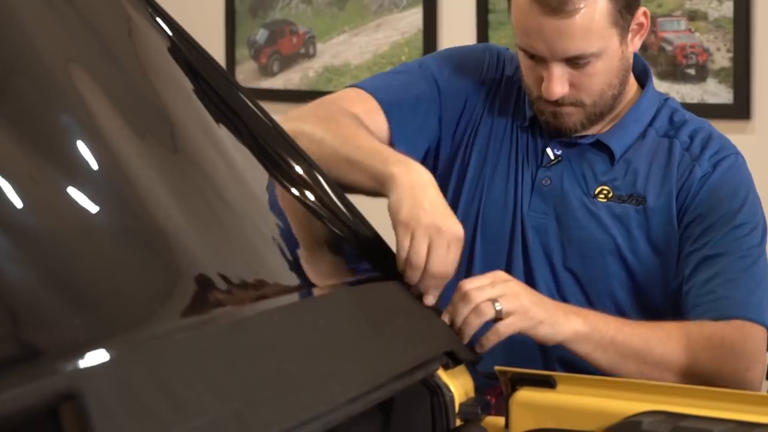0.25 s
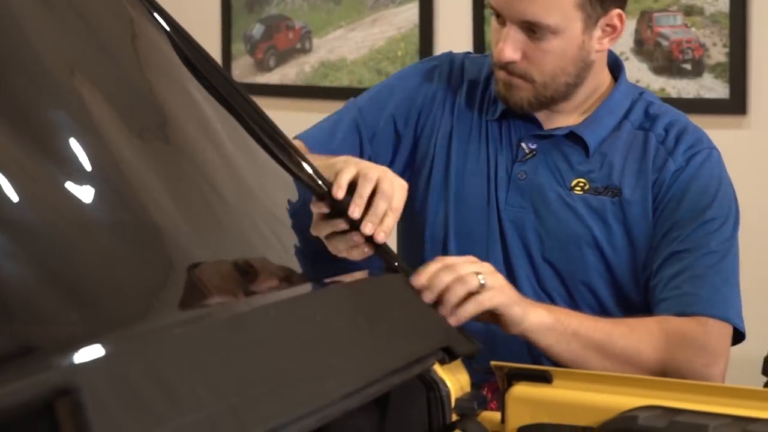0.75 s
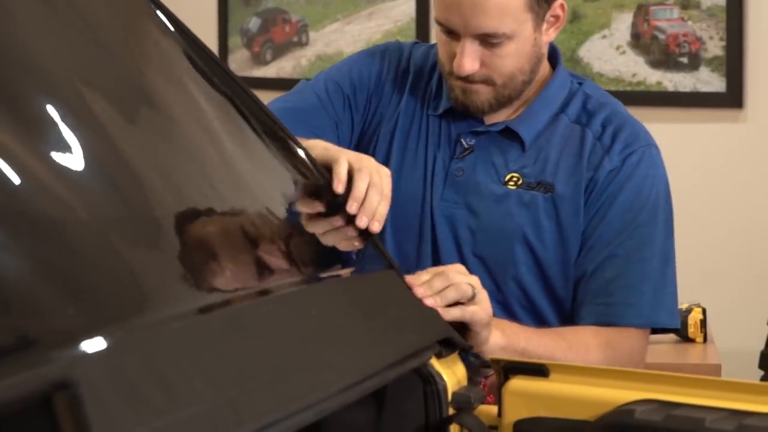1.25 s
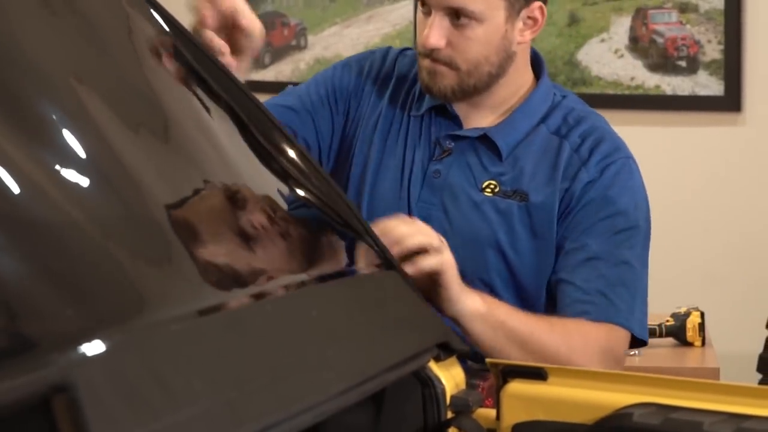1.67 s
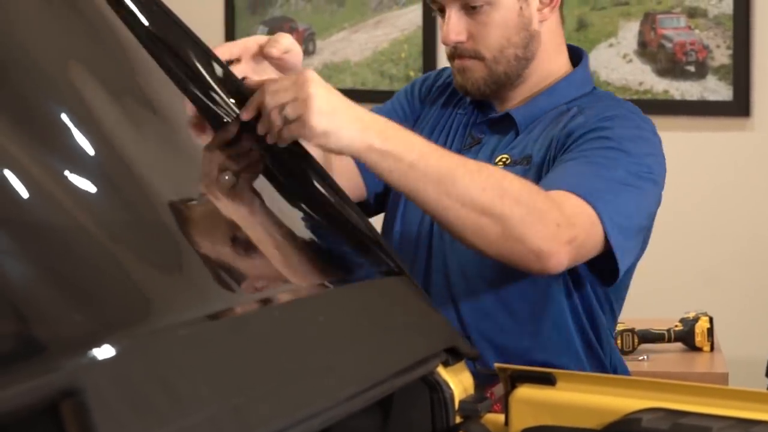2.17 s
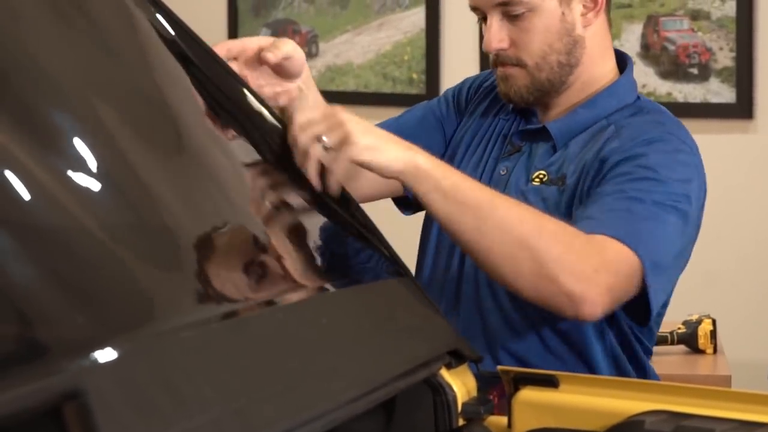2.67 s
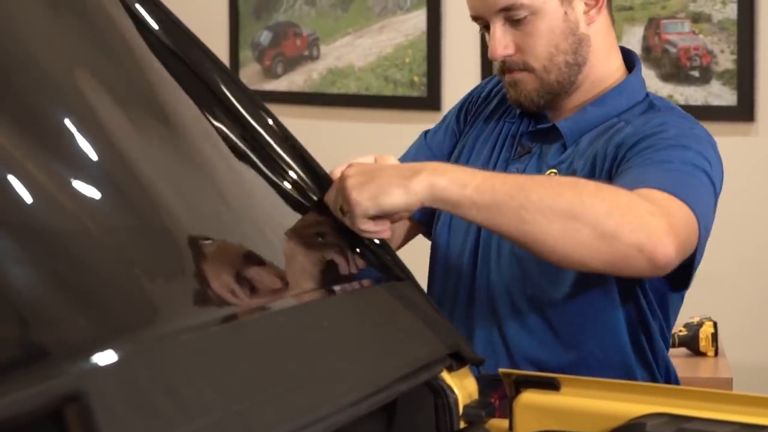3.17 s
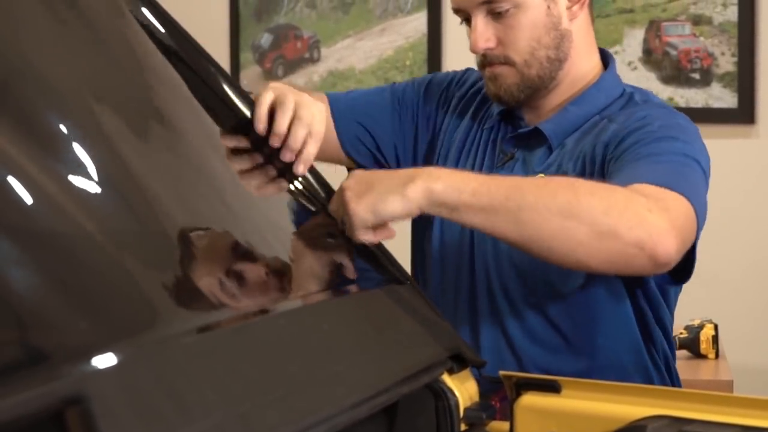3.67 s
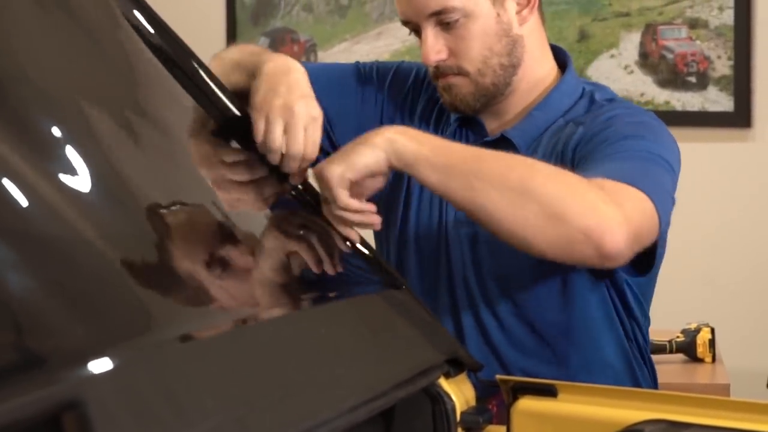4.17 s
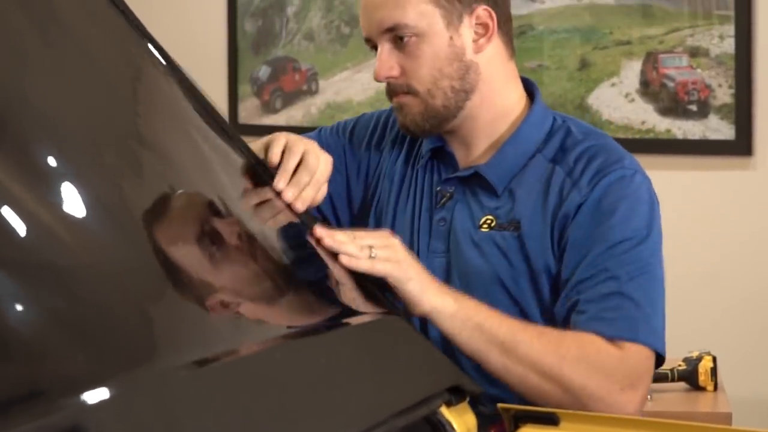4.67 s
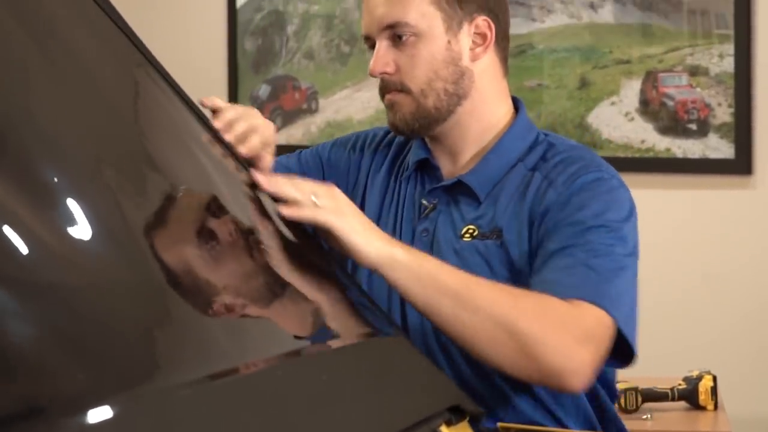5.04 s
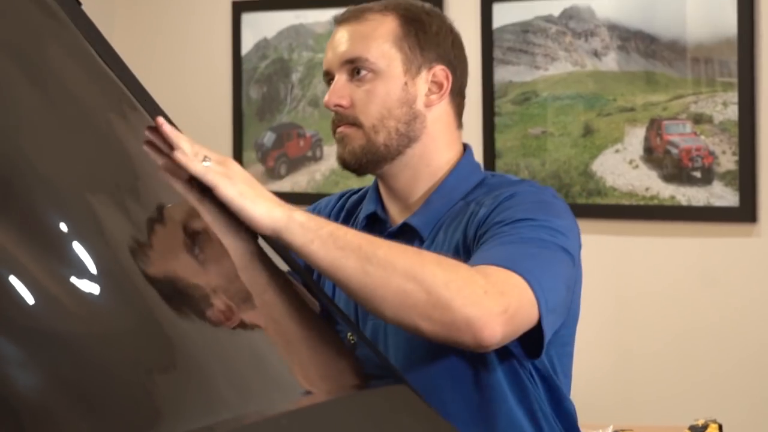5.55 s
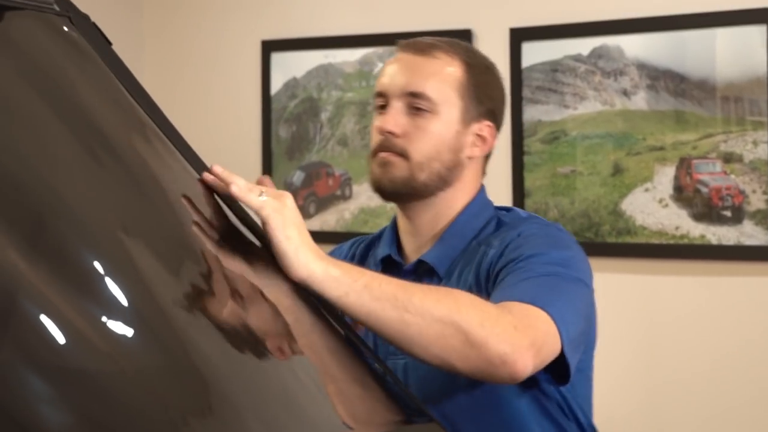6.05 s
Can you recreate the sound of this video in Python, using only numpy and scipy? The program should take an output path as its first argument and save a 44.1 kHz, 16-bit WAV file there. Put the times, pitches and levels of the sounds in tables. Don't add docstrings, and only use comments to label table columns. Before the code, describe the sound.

A quiet furnished room with steady low ventilation rumble, heard close. From 0 to 1.3 seconds skin and sleeve rub faintly on glossy plastic, with tiny ticks and a small creak near 0.8. At 1.31 a rapid cluster of sharp, ringing clip cracks snaps out within about 15 milliseconds, with a light panel thump. Soft brushing and minor creaks follow until 2.47-2.49, when a crunch and deep, dull push thump the panel. A small knock comes at 2.66, then faint slides, rasps and barely audible thin squeaks around 3. Light taps at 3.4 and 4.17 lead to crisp clicks at 4.22 and 4.30. At 4.73-4.78 the loudest event grinds, cracks and bangs home, bright on top and hollow below, ringing briefly. Hand sliding hisses around 5, a faint bump lands at 5.6, a soft double knock at 5.9, then gentle brushing to 6.3.

```python
import sys
import numpy as np
from scipy import signal
from scipy.fft import rfft, irfft
from scipy.io import wavfile

SR = 44100
rng = np.random.default_rng(int(sys.argv[2]) if len(sys.argv) > 2 else 0)


def transcribe(u):
    v = np.clip(np.atleast_2d(u).T, -1, 1)
    q = np.round(v * 32767).astype(np.int16)
    wavfile.write(sys.argv[1], SR, q)


def gain_from_db(level_db):
    decades = np.asarray(level_db, float) / 20
    return 10 ** decades


N = 277830


def in_time(rows):
    s, *columns = np.transpose(rows)
    return [np.interp(np.arange(N) / SR, s, column) for column in columns]


def at_hz(points, hz):
    point_hz, value = np.array(points).T
    return np.interp(np.log(hz), np.log(point_hz), value)


def rms_one(x):
    return x / np.sqrt(np.mean(x ** 2) + 1e-20)


def coloured(spectrum):
    hz = np.maximum(np.arange(N // 2 + 1) * SR / N, 1)
    inside = (hz > spectrum[0][0]) & (hz < spectrum[-1][0])
    white = rfft(rng.standard_normal(N))
    return rms_one(irfft(white * gain_from_db(at_hz(spectrum, hz)) * inside, N))


def drift(rate_hz):
    r = np.exp(-2 * np.pi * rate_hz / SR)
    wander = signal.lfilter([1], [1, -2 * r, r * r], rng.standard_normal(N + SR))
    return rms_one(wander[SR:])


def ring(x, hz, t60_s):
    r = gain_from_db(-60 / (t60_s * SR))
    w = 2 * np.pi * hz / SR
    return signal.lfilter([0, np.sin(w)], [1, -2 * r * np.cos(w), r * r], x)


def bandpass(x, order, low_hz, high_hz):
    return signal.sosfilt(signal.butter(order, [low_hz, high_hz], "band", fs=SR, output="sos"), x)


def add(out, s, peak_db, sound):
    i = int(s * SR)
    out[i:i + len(sound)] += (gain_from_db(peak_db) * sound / np.abs(sound).max())[:N - i]


# t/s, peak level/dB, ring f/Hz, brightness/dB, slip/ms
SNAPS = [(1.3074, -11.5, 2580, -20, 2), (1.3145, -12, 3500, -4.5, 4.1), (1.321, -13, 2820, 0, 2),
         (1.3215, -15.5, 6900, -14, 2.1), (1.356, -27, 2520, -2, 1.9), (1.357, -32, 5400, -21, 2.0),
         (1.3679, -31, 2550, -25, 4.3), (2.4695, -32.5, 1090, -3, 3.1), (2.476, -26.5, 1890, -22, 4.3),
         (2.483, -25.5, 5360, 2, 2.7), (2.657, -41.5, 6850, -4, 2.9), (4.0243, -45, 2240, -20, 2.1),
         (4.2158, -26, 2620, -4, 2.1), (4.3035, -24.5, 2700, -2, 3.1), (4.3045, -24.5, 4500, 0.5, 2.4),
         (4.3195, -29.5, 885, -26, 2.2), (4.732, -31.5, 2180, -9, 2.8), (4.741, -17.5, 1530, -17, 2.9),
         (4.7453, -17, 1230, -12, 2.3), (4.7494, -15.5, 2860, -1, 3.3), (4.7565, -13.5, 3755, 6, 3.2),
         (4.7594, -10, 5400, -3, 3.4), (4.7598, -12, 8550, 3, 2.6), (4.7668, -14, 1610, -18, 2),
         (4.7765, -29, 2380, -11, 2.9), (4.789, -32, 3530, 3, 2.9), (4.7974, -31, 3470, -4, 2.9),
         (5.5905, -36, 856, -7, 2), (5.893, -37.5, 2280, 0.5, 2.9), (5.9013, -33.5, 1290, -6, 2.5)]
# t/s, peak level/dB, ring f/Hz
CREAKS = [(0.159, -50, 3970), (0.174, -46, 4000), (0.316, -42, 1200), (0.775, -34.5, 1190),
          (0.99, -54, 4390), (1.1012, -44, 1610), (1.13, -45, 2590), (1.226, -49, 1160), (1.258, -47, 3210),
          (1.266, -39, 1240), (1.5355, -40, 1380), (2.0262, -44, 3300), (2.8195, -46, 2320),
          (3.124, -42, 1000), (3.4375, -53, 3000), (3.7903, -44.5, 2770), (3.952, -49, 2230),
          (3.991, -52, 4000), (4.12, -62, 2220), (4.2122, -34, 2130), (4.253, -42, 2020),
          (4.3155, -44, 2560), (4.327, -44, 2970), (4.3418, -41, 2240), (4.35, -50, 1310),
          (4.5446, -44, 1250), (4.5505, -43, 1500), (5.583, -43, 3600)]
CREAK_BRIGHT_DB, CREAK_SLIP_MS = -16, 2.53


def cracks():
    out, t = np.zeros(N), np.arange(2048) / SR
    rows = SNAPS + [(*row, CREAK_BRIGHT_DB, CREAK_SLIP_MS) for row in CREAKS]
    draws = rng.standard_normal((len(rows), 3, len(t)))
    for (s, peak_db, hz, bright_db, slip_ms), (body, edge, grit) in zip(rows, draws):
        span = t / (max(slip_ms, .4) / 3000)
        slip = span * np.exp(-span) * gain_from_db(4.8 * grit)
        wide = bandpass(slip * body, 3, 0.19 * hz, min(1.97 * hz, 9500))
        add(out, s, peak_db, rms_one(ring(wide, hz, 10.6 / hz)) + 0.87 * rms_one(wide))
        add(out, s, peak_db + bright_db - 6.5, bandpass(slip * edge, 2, 6200, 15000))
    return out


# t/s, peak level/dB, f/Hz, decay/cycles
TAPS = [(1.3075, -22, 2300, 3.7), (1.3152, -13.5, 2560, 20), (1.3151, -17, 3780, 26),
        (1.3218, -16, 2700, 19), (1.3562, -35, 2440, 8.2), (1.5356, -40, 1400, 5.0), (2.82, -46, 2400, 3.0),
        (3.1249, -41, 1500, 3.0), (3.4105, -33.5, 1200, 3.0), (4.1727, -37, 1900, 4.0),
        (4.217, -28, 6800, 16), (4.2185, -32, 2200, 8.0), (4.3035, -28, 2950, 12.0),
        (4.304, -20, 2900, 10.0), (4.30535, -21, 2500, 18), (4.3046, -22, 4530, 14.0),
        (4.3055, -30, 6030, 18.0), (4.3165, -37, 2300, 4.0), (4.3203, -33, 1800, 3.0),
        (1.3112, -27, 1450, 6.6), (1.3158, -17, 3180, 12.0), (1.3165, -20, 5000, 16.0),
        (1.3222, -17, 7000, 23), (1.3574, -33, 5340, 16.0), (1.3572, -33, 3000, 6.0),
        (2.4718, -36, 1900, 4.0), (2.4745, -34, 2900, 5.0), (2.4765, -31, 1900, 6.0),
        (2.4792, -30, 2000, 6.0), (2.4845, -28, 1300, 3.0), (2.4892, -30, 2000, 3.0),
        (3.4107, -38, 2500, 5.6), (4.1787, -42, 2300, 4.0), (4.1945, -41, 1900, 10.0),
        (4.2022, -42, 2000, 6.0), (4.213, -32, 2110, 14.0), (4.2155, -26, 3400, 12),
        (4.0442, -42, 2050, 4.0), (5.2412, -46, 13500, 8.0), (0.265, -52, 8400, 12.0),
        (0.4925, -50, 14000, 12.0), (1.3172, -20, 4200, 14.0), (1.3228, -22, 4300, 10.0),
        (5.5912, -42, 3000, 3.0), (5.8942, -40, 4000, 4.0), (4.3255, -39.5, 3200, 8.0),
        (4.7418, -18, 700, 2), (4.746, -20, 700, 2.5), (4.7515, -33, 12400, 30.0), (4.7607, -8, 910, 2),
        (4.7606, -10.5, 8200, 18.0), (4.7618, -12, 10100, 24), (4.7668, -13, 750, 1.8),
        (5.9, -35, 1200, 1.3)]


def taps():
    out, click = np.zeros(N), np.eye(1, 1024)[0]
    for s, peak_db, hz, cycles in TAPS:
        softened = ring(click, hz, cycles / hz)
        add(out, s, peak_db, ring(softened, hz, 1.55 / hz))
    return out


# t/s, peak level/dB, panel f/Hz
PUSHES = [(1.3252, -20.5, 150), (1.355, -30, 205), (1.539, -34, 239), (1.564, -33, 215), (2.03, -48, 62.5),
          (2.4675, -23.5, 245), (2.472, -19.5, 156), (2.4841, -11.5, 133.5), (2.508, -28, 111),
          (3.72, -38.5, 70), (4.2146, -28, 110), (4.318, -32, 220), (4.481, -35, 140), (2.628, -39, 150),
          (4.751, -15.5, 210), (4.755, -12, 166), (4.7673, -10.5, 135), (4.949, -39, 124),
          (5.583, -34.5, 211), (5.865, -37.5, 123.7), (5.893, -26.5, 153), (5.901, -29.5, 72.5)]
# t/s, peak level/dB, strip f/Hz, t60/s
KNOCKS = [(1.207, -34, 318, 0.041), (1.3144, -21.5, 426, 0.046), (1.3221, -23, 520, 0.017),
          (2.488, -21.5, 710, 0.0092), (2.658, -33.5, 320, 0.021), (4.172, -40.5, 696, 0.07),
          (4.217, -28.5, 840, 0.026), (4.3043, -15, 410, 0.009), (4.3046, -24, 760, 0.006),
          (2.484, -31, 1010, 0.03), (2.485, -29, 460, 0.04), (2.52, -38, 300, 0.1), (5.268, -41, 310, 0.12),
          (5.438, -42, 330, 0.02), (0.316, -42, 600, 0.02), (4.732, -22, 275, 0.029),
          (4.742, -19, 311, 0.018), (4.7572, -12, 471, 0.043), (4.76, -35.5, 337, 0.033),
          (4.7594, -6, 860, 0.02), (4.766, -28, 586, 0.036), (4.772, -25, 251.6, 0.31),
          (4.78, -29, 286, 0.29), (5.29, -35.5, 300, 0.16), (5.893, -26.5, 440, 0.0098)]
THUMP_T60_S, PITCH_DAMPING, GRIP_DAMPING = 0.079, 0.73, 0.12


def thumps():
    out, push = np.zeros(N), np.zeros(SR // 3)
    push[:60] = np.hanning(60)
    rows = list(KNOCKS)
    for s, peak_db, hz in PUSHES:
        grip = gain_from_db(-GRIP_DAMPING * (peak_db + 28.5))
        rows.append((s, peak_db, hz, THUMP_T60_S * (200 / hz) ** PITCH_DAMPING * grip))
    for s, peak_db, hz, t60_s in rows:
        main = ring(push, hz, t60_s)
        lower = 0.21 * ring(push, 0.697 * hz, t60_s)
        stiffer = 0.72 * ring(push, 2.185 * hz, 0.38 * t60_s)
        add(out, s, peak_db, stiffer - main - lower)
    return out


# t/s, length/ms, level/dB, low f/Hz, high f/Hz
GRINDS = [
    (2.444, 30, -57.5, 1500, 15700),
    (2.467, 34.5, -48, 2900, 15500),
    (2.474, 22.6, -39.5, 920, 3000),
    (2.6527, 19, -49, 2400, 17000),
    (4.19, 28, -45, 1230, 4100),
    (4.207, 16, -44, 3900, 14000),
    (4.7495, 12, -28.5, 5300, 11000),
    (4.746, 15.9, -19, 680, 5500),
    (4.755, 5.8, -30.5, 5100, 10400),
    (4.645, 43, -57, 7500, 15700),
]
# t/s, length/ms, level/dB, centre f/Hz
SLIDES = [(.01, 47, -60, 3300), (0.097, 93, -55, 2500), (.77, 140, -61, 2830), (1.059, 50, -61.5, 2830),
          (1.25, 180, -63, 2250), (1.352, 31, -42.5, 2100), (1.68, 150, -61, 3130), (1.82, 31, -63, 5100),
          (2.019, 50, -60, 3040), (2.59, 60, -59, 1680), (2.817, 19, -56.5, 2600), (2.86, 216, -57, 3150),
          (3.123, 121, -52.5, 2320), (3.19, 180, -65.5, 2330), (3.47, 83, -56, 1520),
          (3.53, 93, -59.5, 2870), (3.72, 75, -61.5, 1970), (3.85, 78, -65.5, 2800), (4.0, 94, -56, 2180),
          (4.41, 65, -64, 2200), (4.17, 21, -51.5, 1840), (4.18, 124, -49, 687), (4.217, 29, -43.5, 2030),
          (4.309, 13, -59, 1900), (4.489, 83, -55.5, 2120), (4.58, 75, -63, 3430), (5.26, 130, -62, 2600),
          (1.5, 130, -60, 2000), (5.572, 20, -56, 3500), (4.764, 12, -33, 3200), (4.762, 58, -41.5, 2900),
          (4.78, 116, -50, 2900), (5.48, 120, -60, 2180), (5.83, 56, -57, 3180), (6.05, 86, -64.5, 3100),
          (6.211, 110, -59, 3470)]
# t/s, length/ms, level/dB, centre f/Hz
RASPS = [(.28, 270, -66.5, 3800), (.42, 230, -70, 3700), (.57, 130, -68.5, 3600), (3.9, 30, -68, 5300),
         (4.64, 51, -55, 1300), (5.07, 70, -65, 5300), (5.18, 88, -62, 11000), (2.5, 61, -65, 11000),
         (2.52, 130, -68, 6800), (2.655, 21, -57, 7050), (2.68, 120, -70, 12100), (1.412, 220, -70, 8460),
         (1.515, 65, -63, 7600), (1.53, 70, -56, 1350), (2.89, 110, -64, 4340), (3.412, 24, -63, 11800),
         (5.46, 60, -64, 10600), (5.5, 110, -65, 10300), (5.65, 110, -69, 10300), (5.7, 150, -69, 10500),
         (5.5, 100, -66, 5600), (5.825, 65, -64, 10800), (5.835, 40, -62, 4000), (0.33, 80, -66, 13300),
         (4.59, 70, -63, 12200), (1.54, 60, -60, 2800), (5.13, 106, -59, 2370), (5.24, 100, -58, 3300)]
# t/s, length/ms, level/dB, centre f/Hz
SINGS = [
    (.54, 60, -64, 3950),
    (.33, 50, -68, 4300),
    (.3, 30, -70, 13000),
    (1.44, 55, -65, 8800),
    (1.52, 55, -64, 7400),
    (2.03, 32, -63, 10700),
    (5.07, 60, -66, 5300),
    (5.255, 60, -66, 3500),
    (1.57, 50, -60, 1550),
]
# t/s, length/ms, level/dB, low f/Hz
FLICKS = [(.865, 56, -58.5, 1500), (1.325, 79, -51.5, 4000), (1.451, 9, -53, 1500), (1.478, 12, -61, 3000),
          (4.2955, 6.8, -52, 6500), (2.466, 14, -55, 9000), (3.153, 22, -64, 4000), (4.215, 40, -63, 3500),
          (3.45, 36, -63.5, 3000), (3.899, 47, -60.5, 4430), (4.661, 29, -54.5, 2930)]
# t/s, length/ms, level/dB
BRUSHES = [(.1, 53, -66.5), (.3, 220, -66.5), (.45, 160, -61), (.77, 115, -60.5), (1.11, 100, -73),
           (1.6, 270, -59.5), (2.005, 68, -62), (2.54, 140, -65.5), (2.69, 120, -75), (2.85, 260, -64),
           (3.41, 44, -67), (3.54, 55, -70), (3.685, 90, -69.5), (3.86, 260, -67.5), (4.38, 17, -62),
           (4.49, 100, -61), (4.57, 125, -58), (4.98, 330, -56.5), (5.47, 116, -66), (5.82, 77, -68),
           (5.9, 31, -67), (6.03, 100, -66), (6.2, 110, -62.5)]
BRUSH_LOW_HZ, BRUSH_TOP_HZ, FLICK_TOP_HZ = 8700, 15100, 15350
SLIDE_SPREAD, RASP_SPREAD, SING_SPREAD = 1.82, 1.173, 1.05
BRUSH_PEAK, SLIDE_PEAK, RASP_PEAK, FLICK_PEAK, GRIND_PEAK = .42, .3, .4, .3, .85


def stroke_rows():
    rows = [(*row, BRUSH_LOW_HZ, BRUSH_TOP_HZ, BRUSH_PEAK) for row in BRUSHES]
    for table, spread, peak in [(SLIDES, SLIDE_SPREAD, SLIDE_PEAK), (RASPS, RASP_SPREAD, RASP_PEAK),
                                (SINGS, SING_SPREAD, RASP_PEAK)]:
        rows += [(s, ms, db, hz / spread, hz * spread, peak) for s, ms, db, hz in table]
    rows += [(*row, FLICK_TOP_HZ, FLICK_PEAK) for row in FLICKS]
    return rows + [(*row, GRIND_PEAK) for row in GRINDS]


SKIN_GRAIN_DB, PLASTIC_GRAIN_DB = 1.2, 2.4
CATCHES_PER_S, CATCH_DB, CATCH_SPREAD_DB = 400, 7, 3


def strokes():
    out = np.zeros(N)
    slip = drift(160) + 0.19 * drift(36)
    white = signal.lfilter([1], [1, -.55], rng.standard_normal((2, N)))
    catches = rng.random(N) < CATCHES_PER_S / SR
    catch_db = CATCH_DB + CATCH_SPREAD_DB * np.minimum(rng.exponential(1, N), 3)
    white[1] += catches * gain_from_db(catch_db) * np.sign(white[0])
    for s, ms, level_db, low_hz, high_hz, peak in stroke_rows():
        i = int(s * SR)
        part = np.linspace(0, 1, min(int(ms * SR / 1000), N - i))
        here = slice(i, i + len(part))
        rise_fall = np.interp(part, [0, np.clip(peak, .05, .95), 1], [0, 1, 0])
        swell = np.sin(1.2 * rise_fall) ** 1.3
        plastic = int(low_hz < 6000 and high_hz > 2 * low_hz)
        noise = rms_one(bandpass(white[plastic, here], 3, low_hz, high_hz))
        grain_db = PLASTIC_GRAIN_DB if plastic else SKIN_GRAIN_DB
        out[here] += gain_from_db(level_db + 1.5 + grain_db * slip[here]) * swell * noise
    return out


# t/s, peak level/dB, f/Hz
TICKS = [(0.194, -57, 11700), (0.2349, -59, 14800), (0.2648, -51, 10700), (0.34, -55, 11000),
         (0.4908, -47, 13000), (0.501, -50, 12500), (1.257, -57, 14300), (1.4526, -62, 8700),
         (1.5002, -39, 8900), (4.296, -48, 13000), (4.3174, -55, 10600), (5.24, -48, 11000)]


def ticks():
    out, t = np.zeros(N), np.arange(512) / SR
    for s, peak_db, hz in TICKS:
        burst = rng.standard_normal(len(t)) * t * np.exp(-t / .0005)
        add(out, s, peak_db, bandpass(burst, 2, 0.92 * hz, min(1.1 * hz, 16000)))
    return out


# t/s, f/Hz, level/dB
SQUEAK = [
    (2.92, 11900, -80),
    (2.96, 12000, -74),
    (2.995, 12720, -72),
    (3.015, 12750, -73),
    (3.085, 11200, -78),
    (3.12, 11150, -80),
    (3.155, 11550, -79),
    (3.19, 11000, -90),
]
# t/s, f/Hz, level/dB
WHINES = [
    [(2.55, 15660, -90), (2.9, 15660, -82), (3.07, 15660, -73), (3.1, 15660, -78)],
    [(3.41, 15640, -81), (3.5, 15640, -78), (3.6, 15640, -82)],
    [(3.05, 9300, -80), (3.08, 9000, -78), (3.115, 8700, -82)],
    [(3.405, 11700, -70), (3.42, 11500, -66), (3.435, 11300, -74)],
]


def squeaks():
    out, t = np.zeros(N), np.arange(N) / SR
    for rows in [SQUEAK, *WHINES]:
        hz, level_db = in_time(rows)
        to_edge_s = np.minimum(t - rows[0][0], rows[-1][0] - t)
        fade = np.clip(to_edge_s / 0.017, 0, 1)
        phase = 2 * np.pi * np.cumsum(hz + 25 * drift(120)) / SR
        out += np.sqrt(2) * fade * gain_from_db(level_db + 1 + 4.2 * drift(35)) * np.sin(phase)
    return out


# t/s, pressure level/dB, speed level/dB
RUBBING = [(0, 4, 1), (.65, 0.5, 4.5), (1.1, -3.5, -3), (1.44, 9, 4), (1.63, 0.5, 10.5), (1.95, 1, -1),
           (2.4, -4, -5.5), (2.56, 3, 4.5), (3.14, 6, 1), (3.4, 4, -1.5), (4.12, 3, 0), (4.45, 3, 3),
           (4.71, 5.5, 4.5), (4.82, 11, 9.5), (5.09, -4, 16), (5.32, 0.5, 11), (5.45, -6, 2.5),
           (6.3, -6.5, 1.5)]
# f/Hz, level/dB per Hz
SCUFF = [(530, -56), (900, 3.5), (1800, 0), (1990, 0), (2180, 0.5), (3300, -2.5), (5250, -23.5),
         (7100, -13), (8000, -7.5), (10400, -29.5), (17600, -120)]
HISS = [(3240, -1), (5500, -0.5), (6300, -2), (7000, -9), (8000, -5), (11100, 0.5), (13800, -3.5),
        (15200, -6), (16000, -21.5)]
DRAG = [(180, -50), (300, -0.5), (600, -2.5), (1000, -4), (1600, -11.5), (3000, -22.5)]
SCUFF_DB, HISS_DB, DRAG_DB = -70, -72, -63.5
SCUFF_BY_PRESSURE, SCUFF_BY_SPEED = 0.2, 0.78


def rubbing():
    pressure_db, speed_db = in_time(RUBBING)
    grip = drift(25)
    scuff_db = SCUFF_DB + SCUFF_BY_PRESSURE * pressure_db + SCUFF_BY_SPEED * speed_db + 2.2 * grip
    scuff = gain_from_db(scuff_db) * coloured(SCUFF)
    hiss = gain_from_db(HISS_DB + speed_db + 0.89 * grip) * coloured(HISS)
    drag = gain_from_db(DRAG_DB + pressure_db + 3.3 * drift(16)) * coloured(DRAG)
    return scuff + hiss + drag


# f/Hz, t60/s
ROOM_T60 = [(60, 0.65), (250, 0.48), (1000, 0.25), (4000, 0.15), (8000, 0.092), (16000, 0.052)]
# f/Hz, level/dB
ROOM_COLOUR = [(60, 0), (250, -2.5), (1000, -1), (3000, -5), (8000, -2.5), (16000, 5.5)]
ROOM_DB = -19.5


def room(x):
    t, tail = np.arange(SR // 2) / SR, 0
    white = rng.standard_normal((2, len(t)))
    for k, low_hz in enumerate(45 * 2. ** np.arange(8)):
        octaves = 2 if k == 7 else 1
        band = bandpass(white[k % 2], 2, low_hz, min(low_hz * 2 ** octaves, .45 * SR))
        centre_hz = low_hz * np.sqrt(2)
        decay_db = -60 * t / at_hz(ROOM_T60, centre_hz)
        tail = tail + band * gain_from_db(at_hz(ROOM_COLOUR, centre_hz) + decay_db)
    tail *= np.clip(t / 0.0044 - 1, 0, 1)
    return gain_from_db(ROOM_DB) * signal.fftconvolve(x, tail / np.sqrt(np.sum(tail ** 2)))[:N]


# f/Hz, level/dB per Hz
AIR = [(12, -26.5), (20, 1.5), (60, 0.5), (150, 3), (222, -2.5), (485, -7.5), (542, -9.5), (849, -14),
       (1810, -27), (4300, -37.5), (5680, -45.5), (11400, -54), (14700, -53), (16000, -56)]
AIR_DB = -51.5


def ventilation():
    return gain_from_db(AIR_DB + 0.47 * drift(0.77)) * coloured(AIR)


def scene():
    near = cracks() + taps() + thumps() + strokes() + ticks()
    return (near + room(near) + rubbing() + squeaks() + ventilation())[None]


def low_pass(x):
    return signal.sosfilt(signal.butter(12, 16490, fs=SR, output="sos"), x)


def record(dry):
    mix = signal.sosfilt(signal.butter(2, 45, "high", fs=SR, output="sos"), dry)
    top_cut = signal.ellip(10, .5, 60, 15720, fs=SR, output="sos")
    mix = signal.sosfilt(top_cut, np.clip(mix, -1, 1))
    return low_pass(mix)


dry = scene()
out = record(dry)
transcribe(out)
```